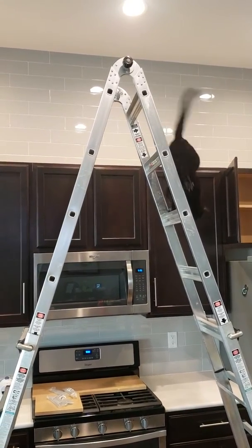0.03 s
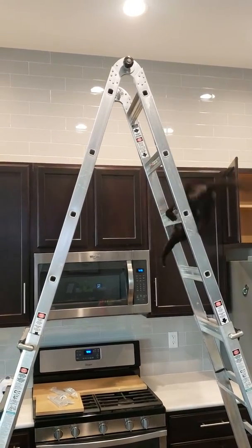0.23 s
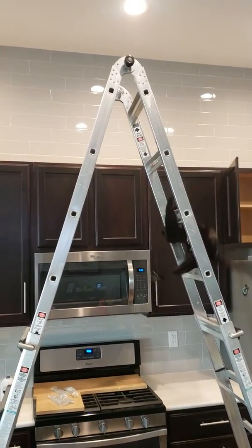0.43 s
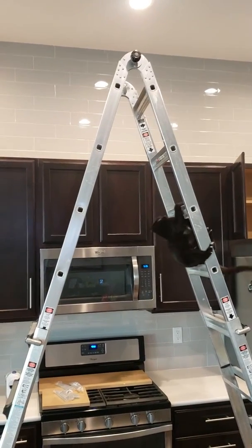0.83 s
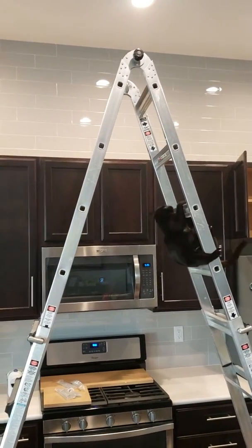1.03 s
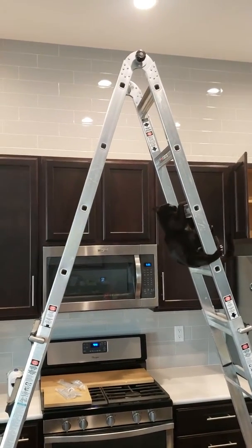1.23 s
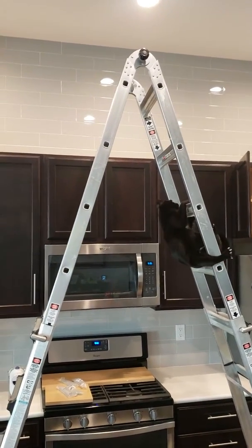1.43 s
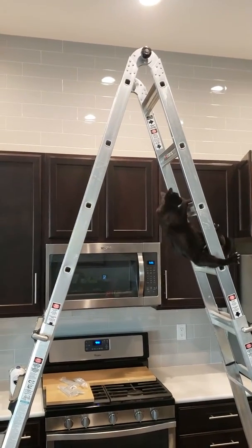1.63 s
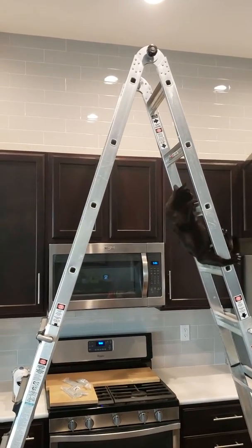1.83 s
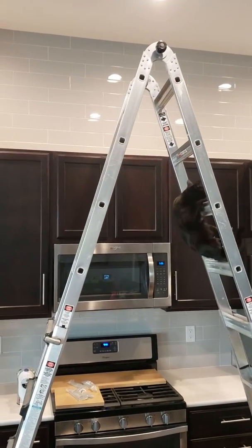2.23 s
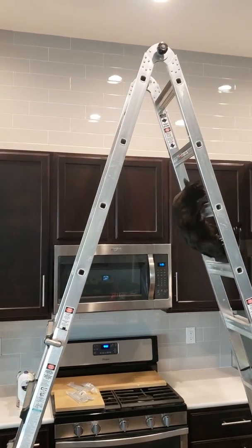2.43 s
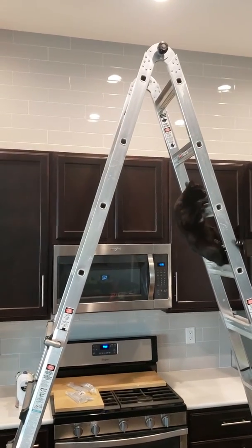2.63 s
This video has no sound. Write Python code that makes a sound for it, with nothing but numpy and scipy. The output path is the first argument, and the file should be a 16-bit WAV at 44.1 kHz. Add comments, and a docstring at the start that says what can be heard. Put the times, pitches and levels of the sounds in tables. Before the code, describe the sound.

An aluminium ladder rattles and rings under a quick burst of blows from a landing cat. It settles, then come a few lighter clacks, claw ticks and faint squeaks, with kitchen echo over a low room rumble.

```python
"""An aluminium ladder clatters as a cat drops onto it and scrambles for a hold.
Each blow makes the hollow rails ring, and the cat's weight makes the whole frame thud and shudder.
Claws tick and squeak on the metal, and later a loose rung clacks. The hard walls of the
quiet kitchen echo the blows over a low room rumble."""
import sys
import numpy as np
from scipy import signal
from scipy.fft import rfft, irfft, next_fast_len
from scipy.io import wavfile

SR = 44100
rng = np.random.default_rng(int(sys.argv[2]) if len(sys.argv) > 2 else 0)


def pcm_store(signal):
    """Save signal as 16-bit PCM."""
    levels = np.round(np.clip(np.atleast_2d(signal), -1, 1) * 32767)
    wavfile.write(sys.argv[1], SR, levels.astype(np.int16).T)


N = 123479
HIT_SAMPLES = 40960  # length of one hit with its ringing


def amp(db):
    """Turns decibels (dB) into a number to multiply a sound by."""
    return np.exp(np.asarray(db) * (np.log(10) / 20))


def unit(x):
    """Scales a sound to an average power of 1."""
    return x / np.sqrt(np.mean(x ** 2) + 1e-20)


def along(points, hz):
    """Reads a curve of (Hz, value) points, with octaves evenly spaced."""
    point_hz, values = np.transpose(points)
    return np.interp(np.log(hz + 1), np.log(point_hz + 1), values)


def fade(t, fade_s):
    """Dies away by 60 dB in the fade time, fade_s."""
    return np.exp(-np.log(1000) * np.maximum(t, 0) / fade_s)


def wobble(rate, size):
    """A curve that glides to a new random value rate times a second."""
    points = rng.standard_normal(1024)
    return np.interp(np.arange(size) * rate / SR, np.arange(len(points)), points)


def filtered(x, gain):
    """Multiplies each frequency in x by gain(hz)."""
    size = next_fast_len(x.shape[-1] + 4096, True)
    return irfft(rfft(x, size) * gain(np.fft.rfftfreq(size, 1 / SR)), size)[..., :x.shape[-1]]


def stereo(pair, db_of):
    """Shapes two noises and blends them: left and right alike in the bass, unlike in the treble."""
    # Each row: frequency in Hz, how alike the two sides are (1 is the same, 0 unrelated).
    likeness = [(100, 0.97), (250, 0.91), (550, 0.62), (1200, 0.0022), (2500, 0.11), (6000, -0.092),
                (14000, 0.18)]

    def gain(hz):
        turn = np.arccos(np.clip(along(likeness, hz), -1, 1)) / 2
        return amp(db_of(hz)) * np.array([np.cos(turn), np.sin(turn)])
    mid, side = filtered(pair, gain)
    return np.array([mid + side, mid - side])


def tail(fade_times):
    """Two fading noises in which each frequency dies at its own speed."""
    hz, t, spectrum = signal.stft(rng.standard_normal((2, HIT_SAMPLES)), SR, nperseg=256)
    spectrum = spectrum * fade(t, along(fade_times, hz)[:, None])
    noise = signal.istft(spectrum, SR)[1][:, :HIT_SAMPLES]
    return unit(noise) / np.sqrt(HIT_SAMPLES)


def add(out, start, x):
    """Mixes x into out at start seconds, or at 0 if start is negative."""
    part = out[:, max(round(start * SR), 0):][:, :x.shape[1]]
    part += x[:, :part.shape[1]]


def strike(contact, resonances, notes):
    """One rattling hit on metal: a wash of noise with its kitchen echo, plus wavering notes."""
    # The centres of the low, mid, high and top bands, in Hz.
    band_hz = [900, 3000, 6800, 13000]
    # Each row, in both tables: frequency in Hz, fade time in seconds.
    metal_fades = [(500, 0.81), (3400, 1), (7000, 0.9), (13000, 0.25)]
    kitchen_fades = [(200, 1), (2000, 0.7), (7000, 0.45), (14000, 0.35)]
    # Thin metal gives off little bass. Each row: frequency in Hz, level change in dB.
    bass_cut = [(60, -29.5), (250, -7.5), (450, -15), (650, -0.5)]
    out, t = np.zeros((2, N)), np.arange(HIT_SAMPLES) / SR
    start, contact_s, *band_db, ring_db = contact
    press = np.minimum(t / contact_s, 1) ** 0.45
    rattle = amp(4 * wobble(484.6, HIT_SAMPLES)) * press * fade(t - contact_s, fade_s=0.068)
    clash = unit(rattle * rng.standard_normal((2, HIT_SAMPLES))) / np.sqrt(HIT_SAMPLES)
    echo = signal.fftconvolve(clash, tail(kitchen_fades), axes=1)[:, :HIT_SAMPLES]
    wash = clash + amp(-3) * press * tail(metal_fades) + amp(6) * echo
    wash /= np.sqrt(np.sum(wash ** 2) / (2 * SR * .06))  # same energy for every hit, before shaping

    def force_db(hz):
        return along(list(zip(band_hz, band_db)), hz)

    def colour_db(hz):
        peaks = sum(db * np.exp(-.5 * np.minimum(np.abs(hz - centre) / width, 10) ** 2)
                    for centre, width, db in resonances)
        return force_db(hz) + along(bass_cut, hz) + peaks
    ring = np.zeros((2, HIT_SAMPLES))
    for hz, db, fade_s in notes:
        waver_db = 3 * wobble(70, HIT_SAMPLES)
        level = amp(db + force_db(hz) - band_db[1] + waver_db) * fade(t, fade_s)
        phase = 2 * np.pi * hz * t + .6 * wobble(70, HIT_SAMPLES)
        ring += level * np.sin(np.float32(phase + rng.uniform(0, 2 * np.pi, (2, 1))))
    ring_rise = 1 - np.exp(-t / .006)
    add(out, start, amp(-2.5) * stereo(wash, colour_db) + amp(ring_db) * ring_rise * ring)
    return out


def room_tone():
    """A low, gently wavering rumble with a trace of hiss."""
    # The tone of the room. Each row: frequency in Hz, relative level in dB.
    rumble_shape = [(15, -70), (25, -30.5), (64, -9), (86, -3.5), (148, -7), (178, -7), (281, -14),
                    (340, -10), (378, -11.5), (482, -13.5), (1270, -34.5), (3170, -41), (15500, -44)]
    noise = unit(stereo(rng.standard_normal((2, N)), lambda hz: along(rumble_shape, hz)))
    level_db = -58.5 + 2.5 * wobble(4.5, N)
    lean_db = np.array([[-.7], [.7]])  # a little louder on the right
    return amp(level_db + lean_db) * noise


def claws():
    """Paws scuff and claws tick; where they land decides which notes ring most."""
    # Each row: start and contact time in seconds; low, mid, high, top and ring levels in dB;
    # place between the first foothold (0) and the second (1).
    touches = [(-.01, 0.0042, -51.5, -62.5, -59.5, -69, -87, .5),
               (.06, 0.12, -45, -45, -48, -46.5, -72, .5), (.722, 0.017, -62, -54, -57, -58.5, -72, .5),
               (1.665, .0805, -61, -63.5, -64.5, -65.5, -90, 0),
               (1.867, 0.006, -61, -57.5, -48.5, -67, -58.5, 0.23),
               (2.126, 0.019, -51.5, -47.5, -43, -57, -54, 0.97),
               (2.398, 0.005, -63, -53.5, -50.5, -62.5, -68, 0.59),
               (2.761, .076, -47, -73, -59, -55, -71.5, 0.67)]
    # Resonances, the ranges the metal boosts or dulls. Each row: centre in Hz, width in Hz, boost in dB.
    resonances = [(3540, 190, 6.5), (4200, 92, 7), (5060, 160, 3), (5920, 120, -6), (6700, 300, 8.5)]
    # Ringing notes. Each row: pitch in Hz, relative dB at each of the two footholds, fade in seconds.
    foothold_notes = [(2455, -20, -7, .7), (2799, -18, -7, .55), (3430, 0, -15, .5), (3601, -12, -2, .5),
                      (3973, -4, -22, .7), (4328, -4, -20, .7), (4818, -20, -3, .57), (4930, -11, -25, .7),
                      (5130, -10, -22, .6), (6584, -14, -7, .55), (7170, -15, -11, .35)]
    out = np.zeros((2, N))
    for *contact, place in touches:
        notes = [(hz, np.interp(place, [0, 1], dbs), fade_s) for hz, *dbs, fade_s in foothold_notes]
        out += strike(contact, resonances, notes)
    return out


def rails():
    """Clean blows bring out the hollow rails' resonances strongly, scraping ones less so."""
    # Each row: start and contact time in seconds; low, mid, high, top and ring levels in dB;
    # resonance strength; the frequency this spot favours in Hz; its boost in dB.
    blows = [(.072, 0.0082, -31, -60, -53.5, -72, -85, 0.59, 1070, 6.5),
             (.098, 0.013, -36.5, -82, -58, -73.5, -85.5, 1.2, 1090, 2),
             (.118, .004, -44, -41, -45, -62, -47.5, 1.74, 3380, 14),
             (.193, 0.0095, -42.5, -32, -41.5, -46.5, -36.5, 0.98, 3250, 6),
             (.206, .014, -32.5, -34.5, -33.5, -32.5, -42, 1.57, 6288, 21),
             (.285, 0.012, -46.5, -42, -40.5, -40, -58, 1.57, 4230, 8),
             (.326, 0.011, -41, -47.5, -36, -38.5, -54, 0.91, 3360, 8.5),
             (.341, 0.02, -38.5, -36, -25, -21, -42.5, 1.1, 3384, 18),
             (.399, 0.011, -41.5, -22.5, -27, -53, -46, 0.93, 2200, 8),
             (.518, 0.019, -40, -45, -42, -46.5, -65, 1.06, 4020, 10),
             (.590, 0.074, -38.5, -65, -68, -64, -82, 0.98, 2170, 13),
             (0.784, 0.0078, -58, -52, -57, -62, -61.5, 0.39, 5386, 22)]
    # The rails' resonances. Each row: centre in Hz, width in Hz, boost in dB at strength 1.
    resonances = [(641, 9.2, 6), (825, 72, 8.5), (1260, 85, 10.5), (1913, 90, 10), (2143, 44, 4),
                  (2666, 124, 8), (3050, 63, -2), (3437, 73, 9.5), (4260, 130, 7.5), (4600, 160, -1),
                  (5260, 60, 4.5), (7570, 230, 4), (9080, 770, -4)]
    # Ringing notes. Each row: pitch in Hz, relative level in dB, fade time in seconds.
    notes = [(643, -9, .9), (783, -10, .9), (1853, -7, 1.05), (1909, -10, .9), (2154, -12, .9),
             (2610, -4, .85), (3405, -4, .8), (3450, -6, .8), (4233, -3, .7), (4330, -6, .7),
             (5023, -14, .9), (6277, -12, .4), (7227, -15, .9), (13056, -16, .4), (13448, -16, .4)]
    out = np.zeros((2, N))
    for *contact, strength, favoured_hz, boost_db in blows:
        scaled = [(centre, width, strength * db) for centre, width, db in resonances]
        out += strike(contact, scaled + [(favoured_hz, 60, boost_db)], notes)
    return out


def frame():
    """Each shove of the cat's weight thuds and sets the frame bending to and fro with a low hum."""
    # Each row: start in seconds, shudder level in dB, thud level in dB.
    shoves = [(0.091, -46.5, -44.5), (0.179, -38, -40), (.325, -50, -42.5), (0.421, -36.5, -41.5),
              (.490, -40, -59), (0.557, -40.5, -40.5), (.655, -43.5, -57), (1.955, -52.5, -53),
              (2.457, -53, -56.5), (2.610, -56, -58)]
    # The tone of a thud. Each row: frequency in Hz, relative level in dB.
    thud_shape = [(20, -33.5), (42, 1), (65, -3), (100, 8.5), (165, 1), (280, -5), (420, -18), (800, -22.5),
                  (2000, -89.5)]
    shudder_hz, rise_s = 119, 0.01
    t = np.arange(N) / SR
    start, shudder_db, thud_db = np.transpose(shoves)[:, :, None]
    age = np.maximum(t - start, 0)
    rise = 1 - np.exp(-age / rise_s)

    def level(db, fade_s):
        return np.linalg.norm(amp(db) * rise * fade(age, fade_s), axis=0)  # the shoves' powers add up
    shudder = np.sqrt(2) * np.sin(2 * np.pi * shudder_hz * t + 0.35 * wobble(24.62, N))
    thud = unit(stereo(rng.standard_normal((2, N)), lambda hz: along(thud_shape, hz)))
    return level(shudder_db, fade_s=0.53) * shudder + level(thud_db, fade_s=1) * thud


def rung():
    """The loose rung clacks a little differently at each knock."""
    # Each row: start and contact time in seconds; low, mid, high, top and ring levels in dB;
    # the frequency this spot favours in Hz; its boost in dB.
    knocks = [(1.076, 0.014, -72, -77, -61.5, -75, -93, 4980, 13.5),
              (1.965, 0.01, -39.5, -45.5, -38.5, -39.5, -59, 1670, 9.5),
              (2.449, 0.0038, -44.5, -34.5, -38, -45.5, -50.5, 2630, 6.5),
              (2.494, 0.0085, -42, -42.5, -53.5, -56, -62, 4290, 14),
              (2.578, 0.0036, -59, -54.5, -53.5, -62, -63.5, 1930, 8)]
    # The rung's resonances. Each row: centre in Hz, width in Hz, boost in dB.
    resonances = [(730, 124, 8.5), (1277, 51, 8), (1940, 140, 5), (2670, 134, 6), (4240, 134, 13.5),
                  (5210, 107, 12), (5800, 300, 0.5), (7630, 99, 18), (8530, 190, -15), (9730, 380, -12),
                  (12050, 840, 10)]
    # Ringing notes. Each row: pitch in Hz, relative level in dB, fade time in seconds.
    notes = [(649, -6, .37), (825, 3.5, 0.95), (1970, -3, 0.88), (2154, -2, .82), (2770, -1, 0.49),
             (4255, -7, .45), (4380, -9, 0.44), (5320, -11, 0.39), (7660, -3.5, 0.24)]
    return sum(strike(contact, resonances + [(favoured_hz, 60, boost_db)], notes)
               for *contact, favoured_hz, boost_db in knocks)


def squeaks():
    """A sliding claw sings on one unsteady note, which then dies away."""
    # Each row: start and rise time in seconds, pitch in Hz, level in dB, fade time in seconds.
    slides = [(1.873, 0.015, 2170, -63, 0.49), (2.29, 0.076, 2452, -65.5, 0.61),
              (2.399, 0.0035, 2476, -53.5, 0.49)]
    t, out = np.arange(N) / SR, np.zeros((2, N))
    for start, rise_s, hz, db, fade_s in slides:
        level = amp(db) * np.clip((t - start) / rise_s, 0, 1) * fade(t - start - rise_s, fade_s)
        drift = 1.23 * np.array([wobble(95, N), wobble(91, N)])
        out += level * np.sin(2 * np.pi * hz * t + drift)
    return out


def scene():
    """Rails, rung and claws over the shuddering frame and the room."""
    # Which way the metal's sound leans. Each row: frequency in Hz, left minus right in dB.
    balance = [(300, -2), (800, -1.6), (1500, -3.5), (2800, 0.5), (5000, -0.5), (9000, 1), (14000, -2.5)]
    metal = rails() + rung() + claws() + squeaks()
    placed = filtered(metal, lambda hz: amp(along(balance, hz) * np.array([[.5], [-.5]])))
    return placed + frame() + room_tone()


def record(dry):
    """Cuts off the very highest treble."""
    return filtered(dry, lambda hz: hz < 15760)


dry = scene()
out = record(dry)
pcm_store(out)
```